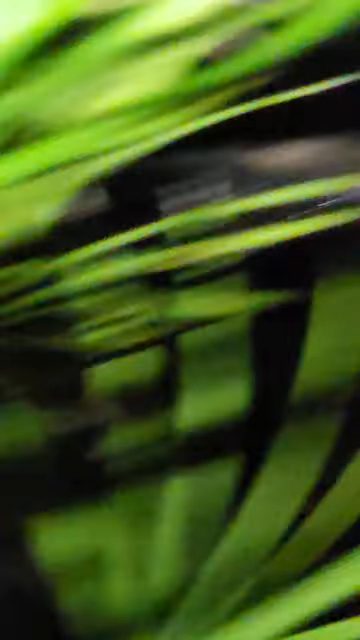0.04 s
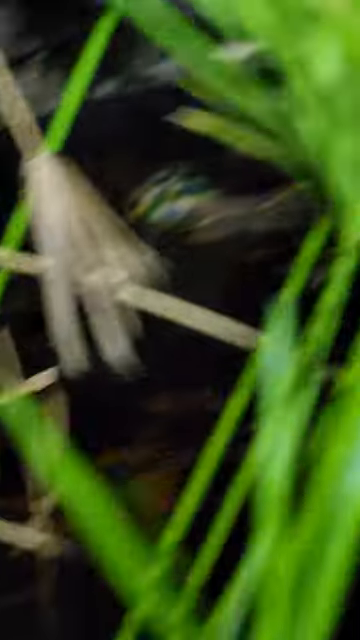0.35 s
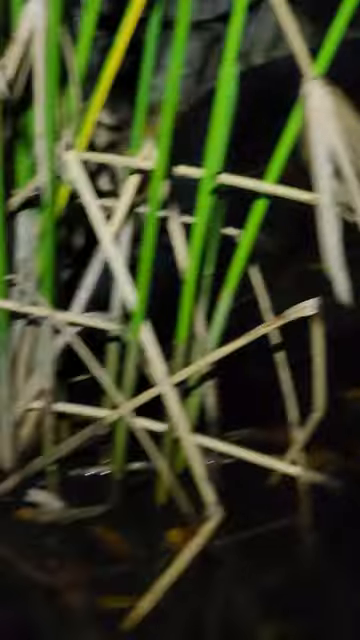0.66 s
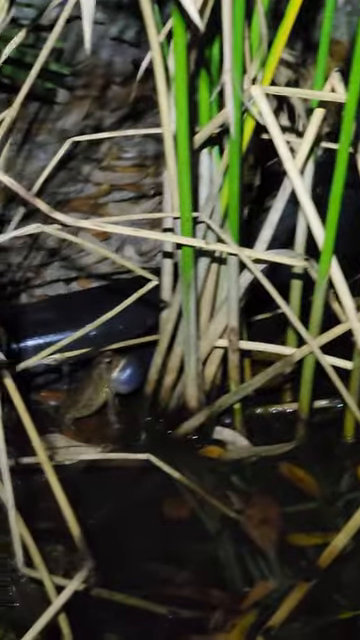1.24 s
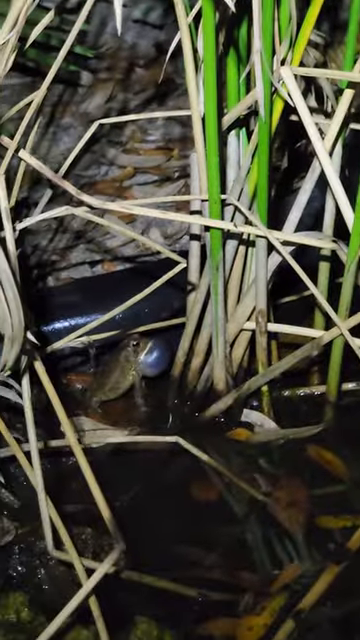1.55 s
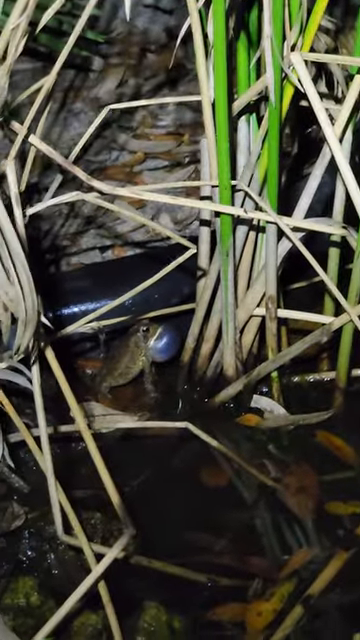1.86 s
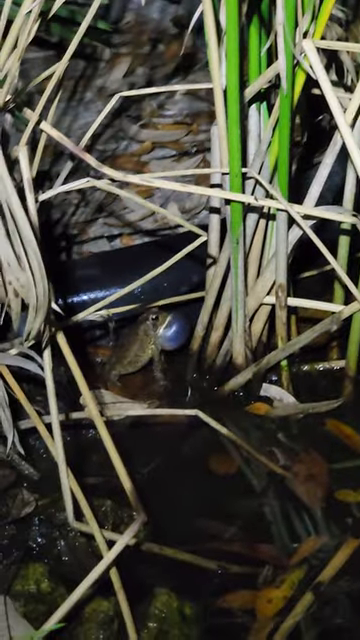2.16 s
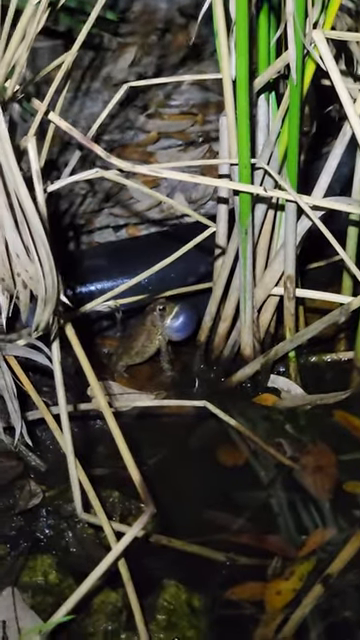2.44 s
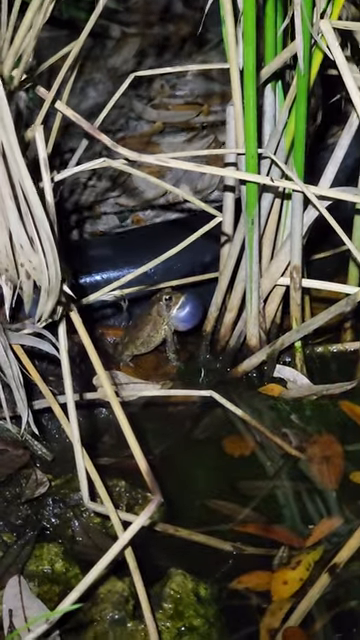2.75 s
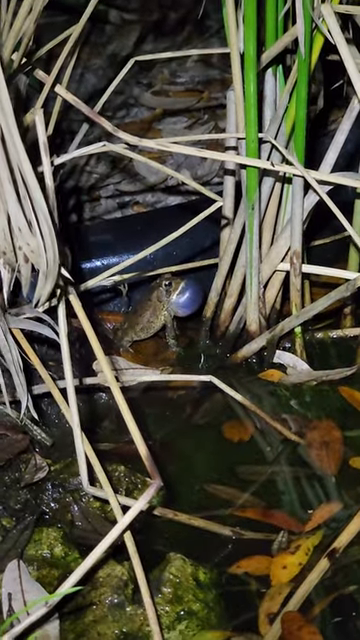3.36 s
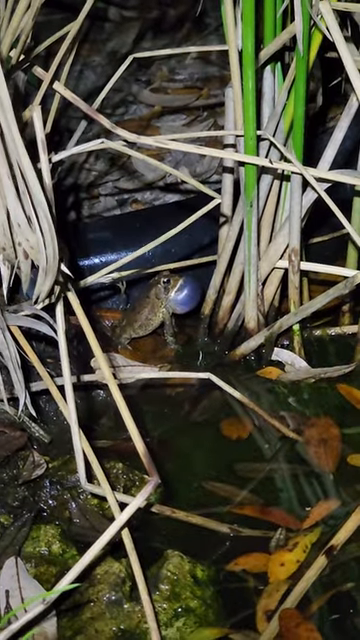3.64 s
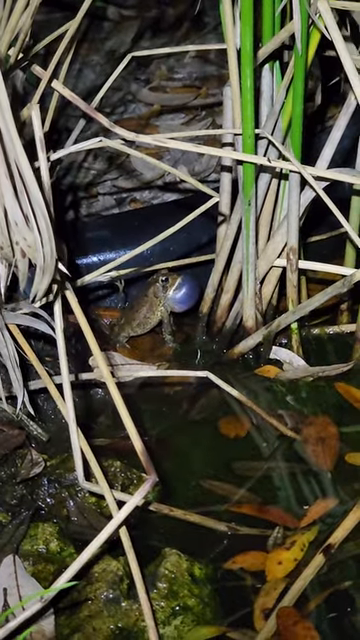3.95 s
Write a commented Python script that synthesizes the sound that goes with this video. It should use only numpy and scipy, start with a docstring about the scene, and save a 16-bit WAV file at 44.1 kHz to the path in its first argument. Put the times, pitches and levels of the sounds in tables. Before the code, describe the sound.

Close by among pond reeds at night, a toad trills from start to finish, a high, rapidly pulsing tone with very short echoes. The hand-held microphone also picks up a soft low rumble and a few faint ticks.

```python
"""A toad's unbroken trill, about 51 pulses a second, close by at the edge of a pond at night.
Each pulse is a short larynx tone that starts abruptly, sags in pitch as it ends and rings the vocal sac.
Bank and reeds return short echoes, which shift as the hand-held camera settles in the first second.
Underneath: a low rumble, a faint hum and a few faint, brief ticks of bright hiss."""
import sys
import numpy as np
from scipy import signal
from scipy.fft import rfft, irfft, next_fast_len
from scipy.io import wavfile
from scipy.ndimage import uniform_filter1d, minimum_filter1d, map_coordinates

SR = 44100
rng = np.random.default_rng(int(sys.argv[2]) if len(sys.argv) > 2 else 0)


def master_out(mix):
    """Clip the mix to full scale and print it as 16-bit PCM to the path in sys.argv[1]."""
    frames = np.transpose(np.atleast_2d(mix))
    ceiling = np.clip(frames, -1, 1)
    pcm = np.round(ceiling * 32767).astype(np.int16)
    wavfile.write(sys.argv[1], SR, pcm)


N = 176400

# night air spectrum: freq_hz, relative_db
AIR_SPECTRUM = [(20, -13), (45, -7), (70, -2.5), (120, -8.5), (200, -21.5), (380, -34), (1000, -16.5),
                (4000, -22.5), (7000, -37), (12000, -72.5)]
# air, stereo side against mid: freq_hz, gain_db
AIR_SIDE_GAIN = [(30, -11), (120, -15), (250, -6.5), (400, -2), (1000, -5.5), (8000, -6.5)]
# faint ticks of hiss: start_s, level_db
FAINT_TICKS = [(0.729, -57), (1, -61), (1.33, -60), (1.81, -59), (2.5, -57), (2.56, -59), (2.651, -60),
               (3.08, -61), (3.9, -60)]
# tick spectrum: freq_hz, relative_db
TICK_SPECTRUM = [(2000, -23), (5000, -3.5), (7500, 0.5), (11000, -10.5), (15000, -18)]
# bank and reed echoes: delay_s, unsettled_extra_s, left_gain, right_gain
NEAR_ECHOES = [(0.0026, .0002, 0, -0.033), (.0049, 0.000066, 0.17, -0.088), (.0078, 0.00038, 0.21, 0.037),
               (0.002555, 0.000025, 0, -0.0074)]
# colour of the right microphone port: freq_hz, relative_db
RIGHT_PORT_COLOUR = [(700, 7.5), (1700, 5), (2100, 2.5), (2400, 4), (2900, 3.5), (4200, 6.5), (6000, -0.5),
                     (8400, -6.5), (15000, -8)]
# trill speed: time_s, pulses_per_s
PULSE_RATE = [(0.0, 52.21), (0.2, 51.44), (0.5, 52.69), (0.85, 52.09), (1.1, 51.23), (1.35, 52.07),
              (1.7, 51.18), (2.05, 50.68), (2.35, 51.53), (2.6, 51.24), (2.8, 51.44), (3.05, 50.63),
              (3.35, 50.63), (3.7, 50.08), (4.0, 50.77)]
# larynx pulse: time_s, pitch_hz, end_fall_hz, fundamental_end_change_db
PULSE_VOICE = [(0, 2077, 251, 2), (.25, 2110, 291.5, 1.5), (.7, 2144, 494, -12), (1.9, 2152, 527, -5.5),
               (2.4, 2158, 438, -6), (4, 2154, 427, -3.5)]
# larynx partials 1-7: relative_db
PARTIAL_LEVELS_DB = [-1, -21.5, -33, -37.5, -46, -59, -51.5]
# envelope of partials 1-7: envelope_index
PARTIAL_ENVELOPE = [0, 1, 2, 2, 3, 3, 3]
# overtone boost: time_s, partial_2_db, partials_3_4_db, partials_5_7_db
OVERTONE_BOOST = [(0, 7.5, 2, 9), (.2, 6.5, 3.5, 8.5), (.45, -2.5, -1.5, 7.5), (.9, -9.5, 0.5, 4.5),
                  (1.4, -4, 2, 3), (1.95, -3.5, 3.5, 1), (2.35, 2, 4, 2.5), (2.9, 2.5, 7, 1.5),
                  (3.3, 4.5, 2, 0), (4, 4, 3, 2.5)]
# breath rasp spectrum: freq_hz, relative_db
RASP_SPECTRUM = [(300, -20), (1000, 0), (3500, -4), (5500, -6), (8000, -6), (15000, -10)]
# vocal sac and throat response: freq_hz, relative_db
SAC_RESPONSE = [(300, -22.5), (470, -22.5), (630, -7), (800, -19), (1100, -5.5), (1400, 0.5), (1580, -7),
                (1790, -0.5), (1910, -9), (2060, 0), (2250, 8), (2550, -17), (2780, -11.5), (2950, -22),
                (3450, -1.5), (4100, -8), (4220, -1.5), (4330, -7.5), (4600, -6), (4950, 8.5), (5400, 8),
                (6100, -13), (6310, -1), (6700, -26), (7750, -9), (8200, -11.5), (8400, 3), (8600, -17.5),
                (9150, -28.5), (9750, 0), (10600, -9.5), (11400, -35), (13000, -13), (15000, -9),
                (15650, 1)]
# body thump modes: freq_hz, relative_db, t60_s
THUMP_MODES = [(159, -35, 0.022), (615, -40.5, 0.024), (642, -40.5, 0.032)]
# trill at the microphone: time_s, relative_db, left_minus_right_db, right_lag_ms
TRILL_AT_MIC = [(0, -12, 0, -0.042), (.3, -10, 1.5, -0.054), (.7, -10.5, 1.3, 0.036),
                (1.1, -10.5, 2, 0.056), (1.55, -11, 3, 0.065), (2.1, -11, 2.5, 0.07),
                (2.6, -11.5, 3, 0.069), (3.1, -12.5, 3, 0.092), (4, -13, 4, 0.085)]


def amp(db):
    """Decibels to gain."""
    return 10 ** (np.asarray(db) / 20)


def unit(x):
    """Scale to rms 1."""
    return x / np.sqrt(np.mean(x ** 2) + 1e-20)


def ramp(u):
    """Smooth step, 0 to 1."""
    return np.sin(np.pi / 2 * np.clip(u, 0, 1)) ** 2


def wobble(t, per_s):
    """Smooth random curve, rms near 1."""
    return map_coordinates(rng.standard_normal(256), [np.abs(t) * per_s + 1], mode="mirror")


def curves(rows):
    """Per-sample curve for each column after time_s."""
    time_s, *columns = np.transpose(rows)
    return [np.interp(np.arange(N) / SR, time_s, column) for column in columns]


def gain_at(spectrum, hz):
    """Gain from (freq_hz, db) rows on a log frequency axis."""
    freq_hz, db = np.transpose(spectrum)
    return amp(np.interp(np.log(hz + 1), np.log(freq_hz + 1), db))


def filtered(x, response):
    """Apply a frequency response."""
    size = next_fast_len(N + SR // 2)
    return irfft(rfft(x, size) * response(np.fft.rfftfreq(size, 1 / SR)), size)[..., :N]


def noise(spectrum):
    """Coloured noise, rms 1."""
    return unit(filtered(rng.standard_normal(N), lambda hz: gain_at(spectrum, hz)))


def resonate(x, spectrum, size=4096):
    """Minimum-phase filter: peaks ring after their excitation."""
    cepstrum = irfft(np.log(gain_at(spectrum, np.fft.rfftfreq(size, 1 / SR))))
    causal_fold = np.r_[1, np.full(size // 2 - 1, 2), np.zeros(size // 2)]
    impulse = irfft(np.exp(rfft(cepstrum * causal_fold)))
    return signal.fftconvolve(x, impulse)[:N]


def delayed(x, delay_s):
    """Time-varying delay."""
    return map_coordinates(x, [np.arange(N) - delay_s * SR], order=5)


def night_air(air_db=-41.5, handling_db=3.5, handling_s=.53, hum_hz=61.2, hum_db=-48):
    """Near-mono rumble, stronger until the camera settles, plus a faint hum."""
    t = np.arange(N) / SR
    air_gain = amp(air_db + handling_db * np.exp(-t / handling_s))
    hum = amp(hum_db) * unit(np.sin(2 * np.pi * hum_hz * t))
    mid = air_gain * noise(AIR_SPECTRUM) + hum
    side = air_gain * filtered(noise(AIR_SPECTRUM), lambda hz: gain_at(AIR_SIDE_GAIN, hz))
    return np.array([mid + side, mid - side])


def faint_ticks(attack_s=.002, t60_s=.06):
    """Faint, brief ticks of bright hiss near 7 kHz."""
    t = np.arange(N) / SR
    envelope = sum(ramp((t - start_s) / attack_s) * amp(db - 60 * np.abs(t - start_s) / t60_s)
                   for start_s, db in FAINT_TICKS)
    return envelope * np.array([noise(TICK_SPECTRUM), noise(TICK_SPECTRUM)])


def bank_echoes(x, settle_s=.15, shake_s=.00002):
    """Stereo reflections off bank and reeds; the unsteady hand shifts their delays."""
    t = np.arange(N) / SR
    unsettled = np.exp(-t / settle_s)
    echoes = np.zeros((2, N))
    for delay_s, extra_s, *gains in NEAR_ECHOES:
        path_s = delay_s + extra_s * unsettled + shake_s * wobble(t, per_s=7)
        echoes += np.outer(gains, delayed(x, path_s))
    return echoes


def pond_tail(x, t60_s=.13, onset_s=.0045, gain_db=-13.5, blend_rad=.99):
    """Short diffuse echo; hand movement blends two stereo tails."""
    t = np.arange(SR // 4) / SR
    tails = rng.standard_normal((4, len(t))) * amp(-60 * t / t60_s) * ramp(t / onset_s)
    tails /= np.linalg.norm(tails, axis=1, keepdims=True)
    wet = amp(gain_db) * signal.fftconvolve(x[None], tails, axes=1)[:, :N]
    angle_rad = blend_rad * wobble(np.arange(N) / SR, per_s=3.995)
    return np.cos(angle_rad) * wet[:2] + np.sin(angle_rad) * wet[2:]


def pulse_clock(first_s=.0149, jitter_s=.00004, wander_s=.00045):
    """Slightly uneven beat. Per sample: age, strength and detune of the current pulse."""
    scatter_db, effort_db, scatter_hz = .3, .4, 8
    t = np.arange(N) / SR
    cycles = np.cumsum(curves(PULSE_RATE)[0]) / SR
    cycles -= np.interp(first_s, t, cycles)
    starts_s = np.interp(np.arange(int(cycles[-1]) + 1), cycles, t)
    starts_s = np.r_[first_s - 1 / PULSE_RATE[0][1], starts_s]  # trill already under way
    timing, size, detune = rng.standard_normal((len(starts_s), 3)).T
    starts_s = starts_s + jitter_s * timing + wander_s * wobble(starts_s, per_s=9.7)
    pulse = np.maximum(np.searchsorted(starts_s, t) - 1, 0)
    strength = amp(scatter_db * size[pulse] + effort_db * wobble(t, per_s=26))
    return np.abs(t - starts_s[pulse]), strength, scatter_hz * detune[pulse]


def larynx(age_s, detune_hz, pulse_s=.0108, attack_s=.00045, release_s=.0014):
    """Opens once a pulse: tone plus breath rasp. Overtones flare as the pitch falls."""
    waver_hz, droop_hz, fall_power = 5, 58, 6.88  # higher power: later fall
    flare_db, flare_power, fade_power, rasp_db = 5, 7, 3.1, -47
    pitch_hz, fall_hz, end_change_db = curves(PULSE_VOICE)
    pitch_hz = pitch_hz + waver_hz * wobble(np.arange(N) / SR, per_s=14) + detune_hz
    progress = np.minimum(age_s / pulse_s, 1)
    sag_integral = droop_hz * progress ** 2 / 2 + fall_hz * progress ** (fall_power + 1) / (fall_power + 1)
    phase_rad = 2 * np.pi * pulse_s * (pitch_hz * progress - sag_integral)
    fade = amp(end_change_db * progress ** fade_power)
    flare = amp(flare_db) * progress ** flare_power
    envelopes = [fade, *(amp(db) + flare for db in curves(OVERTONE_BOOST))]
    tone = sum(amp(db) * envelopes[PARTIAL_ENVELOPE[k]] * np.sin((k + 1) * phase_rad)
               for k, db in enumerate(PARTIAL_LEVELS_DB))
    gate = ramp(age_s / attack_s) * ramp((pulse_s - age_s) / release_s)
    return gate * (tone + amp(rasp_db) * noise(RASP_SPECTRUM))


def toad():
    """Each larynx pulse rings the vocal sac and thumps the body."""
    age_s, strength, detune_hz = pulse_clock()
    voice = unit(resonate(strength * larynx(age_s, detune_hz), SAC_RESPONSE))
    thump = sum(amp(db - 60 * age_s / t60_s) * np.sin(2 * np.pi * hz * age_s)
                for hz, db, t60_s in THUMP_MODES)
    return voice + strength * thump


def scene():
    """Trill and echoes drift left as the camera turns, over air and faint ticks."""
    trill_gain_db = 5
    relative_db, pan_db, lag_ms = curves(TRILL_AT_MIC)
    trill = toad()
    left, right = trill + bank_echoes(trill) + pond_tail(trill)
    right = filtered(right, lambda hz: gain_at(RIGHT_PORT_COLOUR, hz))
    ports = np.array([unit(left), delayed(unit(right), lag_ms / 1000)])
    port_db = trill_gain_db + relative_db + np.array([pan_db, -pan_db]) / 2
    return ports * amp(port_db) + night_air() + faint_ticks()


def record(dry):
    """Camera peak limiter, then band limit."""
    ceiling, hold_s, top_hz = .97, .02, 15900
    hold_samples = int(hold_s * SR)
    needed_gain = ceiling / np.maximum(np.abs(dry).max(axis=0), ceiling)
    gain = uniform_filter1d(minimum_filter1d(needed_gain, 2 * hold_samples), hold_samples)
    return filtered(dry * gain, lambda hz: hz < top_hz)


dry = scene()
out = record(dry)
master_out(out)
```